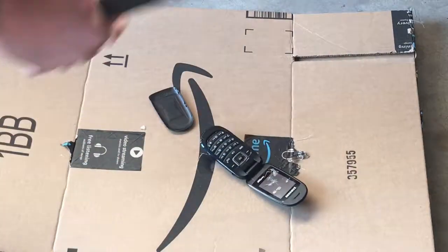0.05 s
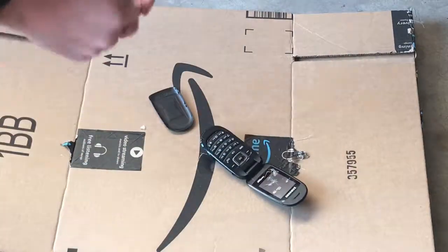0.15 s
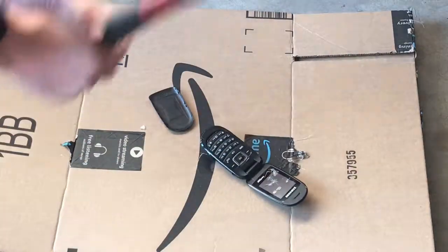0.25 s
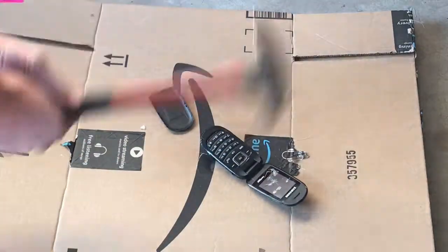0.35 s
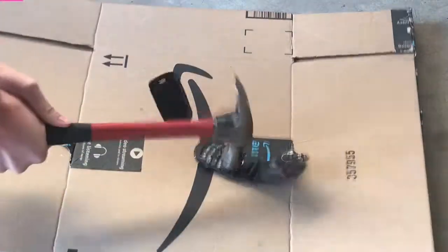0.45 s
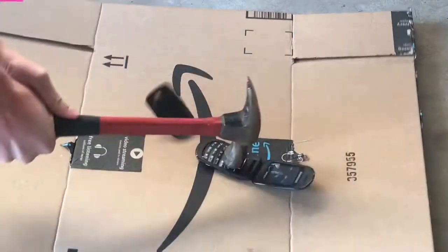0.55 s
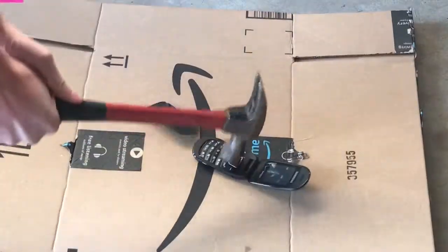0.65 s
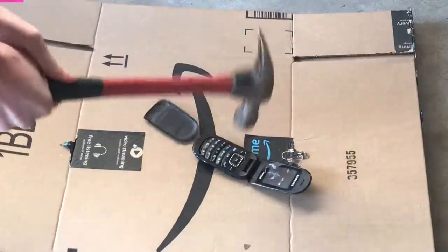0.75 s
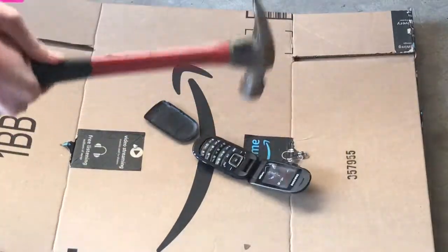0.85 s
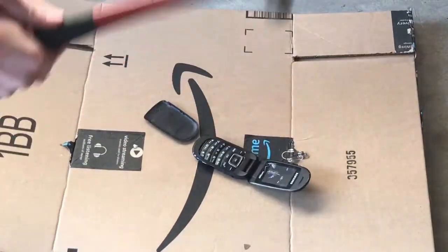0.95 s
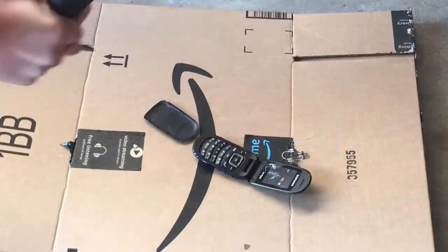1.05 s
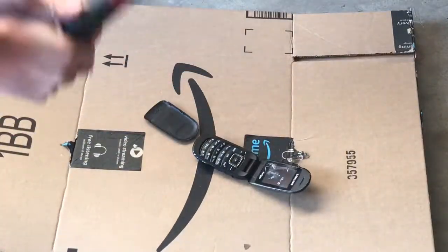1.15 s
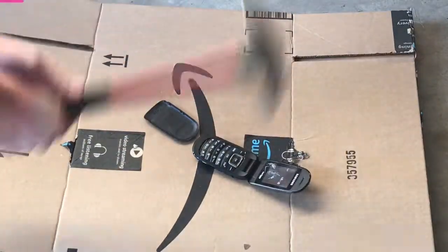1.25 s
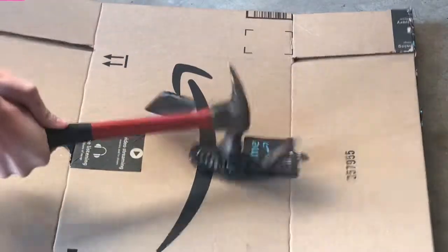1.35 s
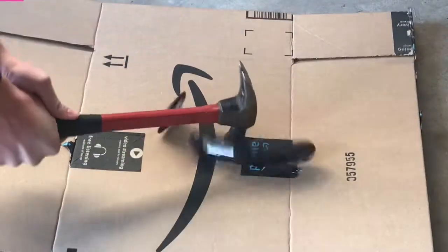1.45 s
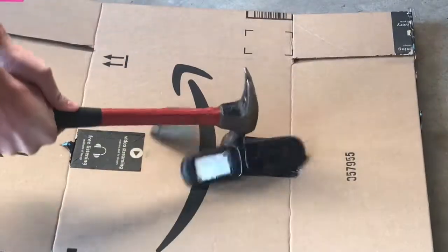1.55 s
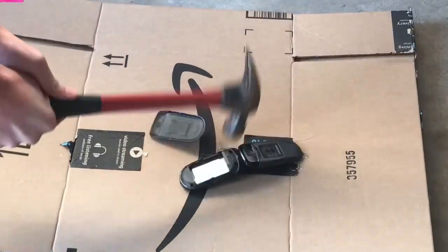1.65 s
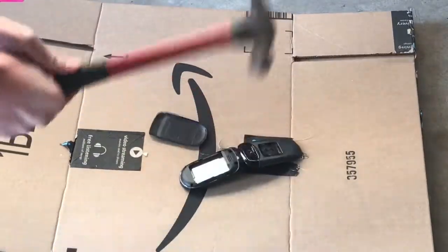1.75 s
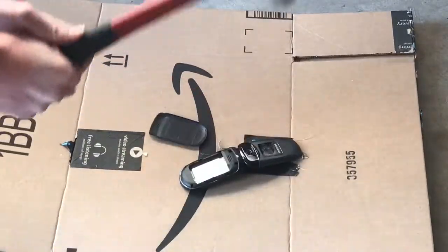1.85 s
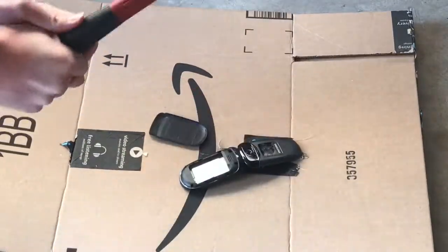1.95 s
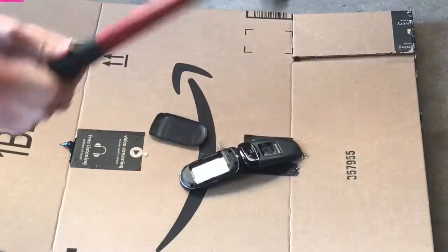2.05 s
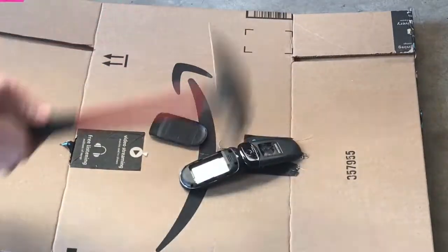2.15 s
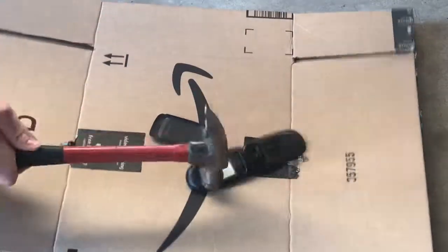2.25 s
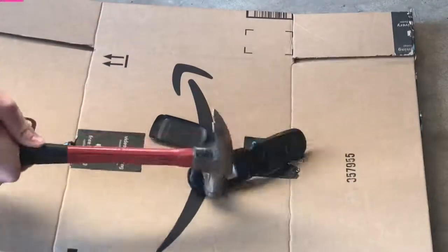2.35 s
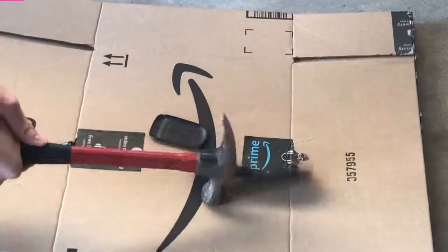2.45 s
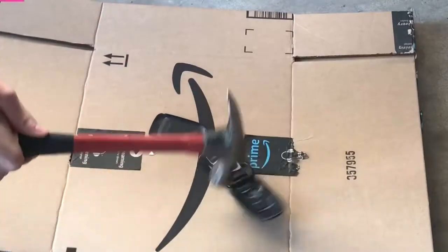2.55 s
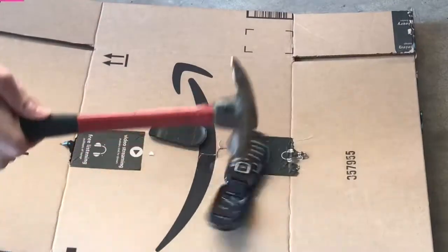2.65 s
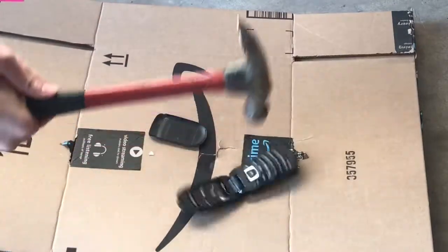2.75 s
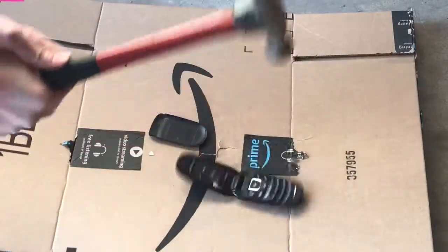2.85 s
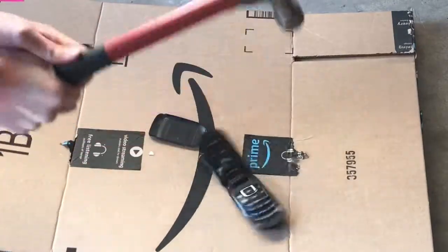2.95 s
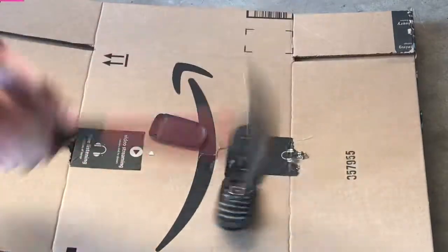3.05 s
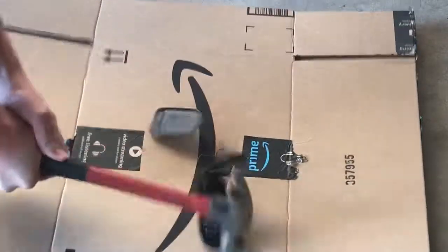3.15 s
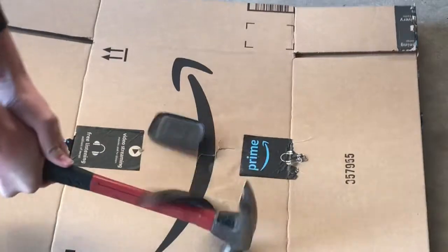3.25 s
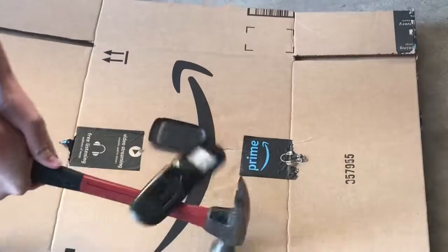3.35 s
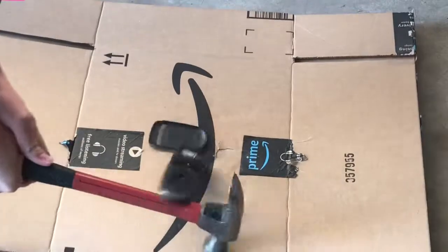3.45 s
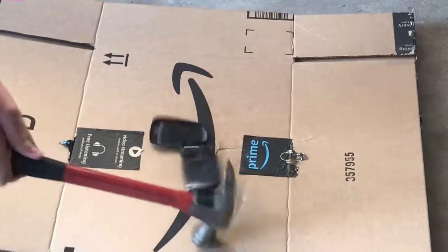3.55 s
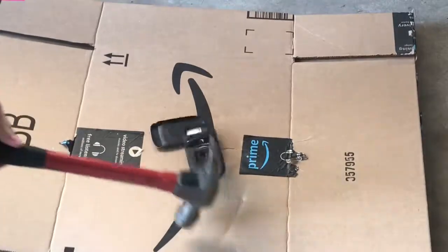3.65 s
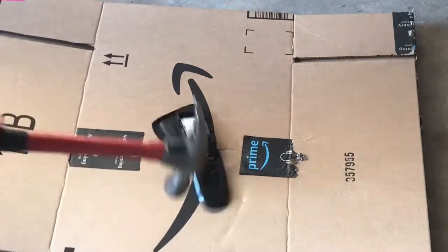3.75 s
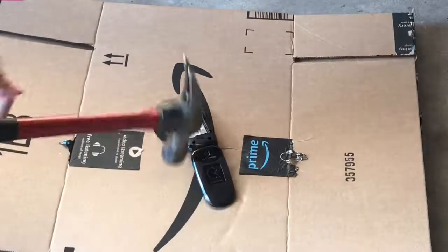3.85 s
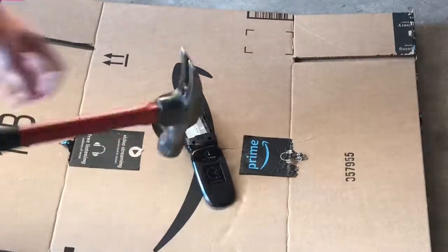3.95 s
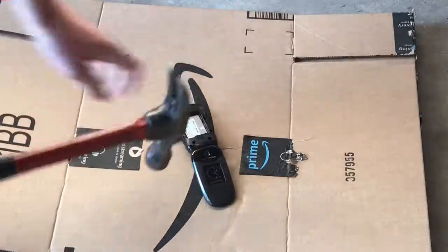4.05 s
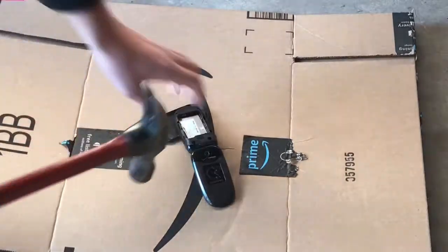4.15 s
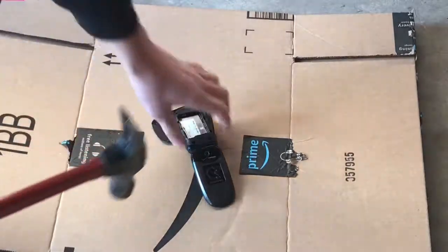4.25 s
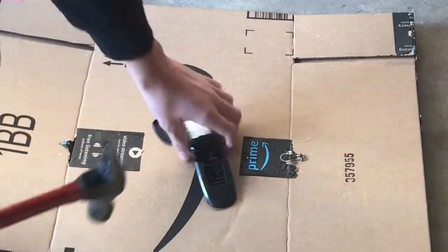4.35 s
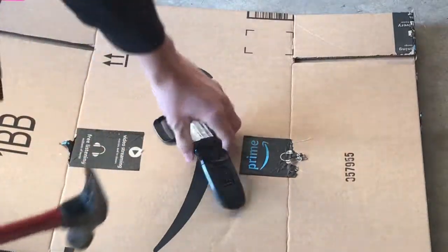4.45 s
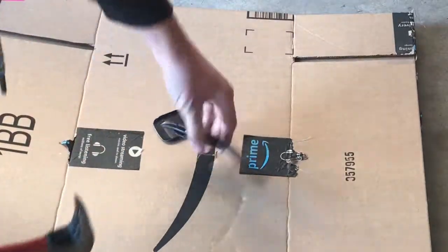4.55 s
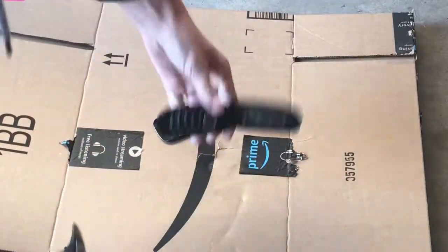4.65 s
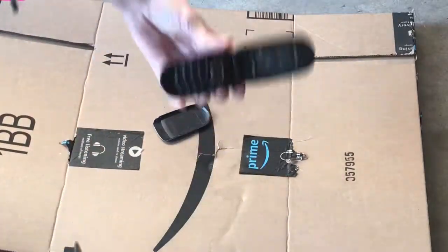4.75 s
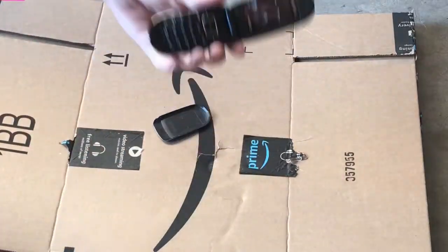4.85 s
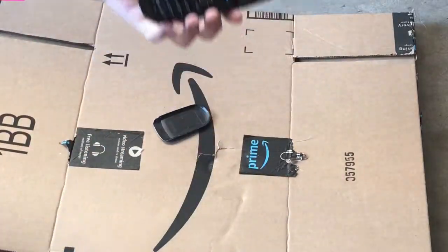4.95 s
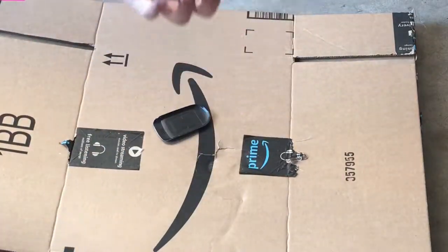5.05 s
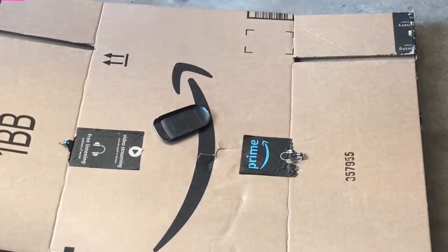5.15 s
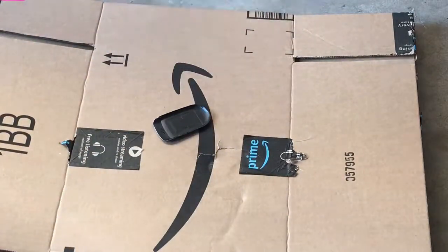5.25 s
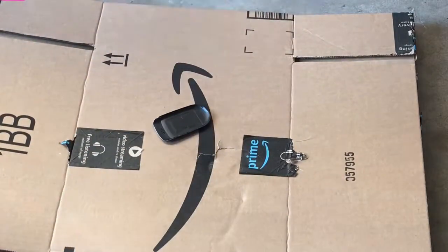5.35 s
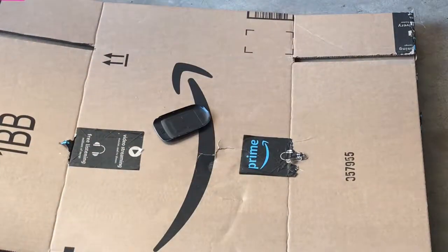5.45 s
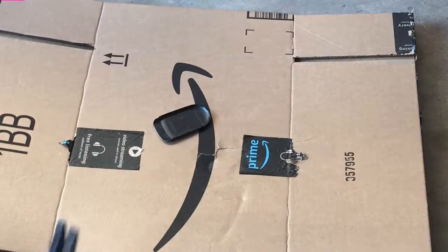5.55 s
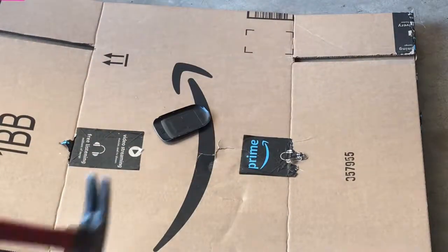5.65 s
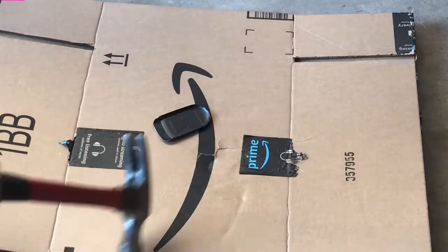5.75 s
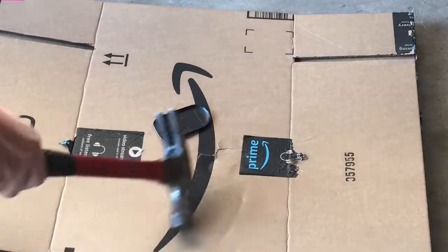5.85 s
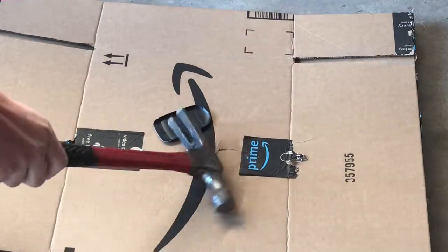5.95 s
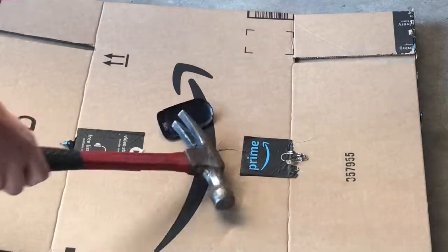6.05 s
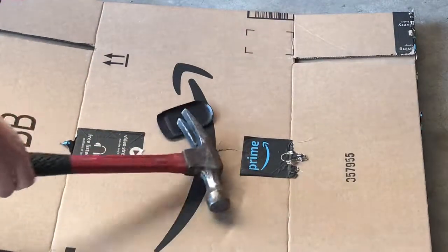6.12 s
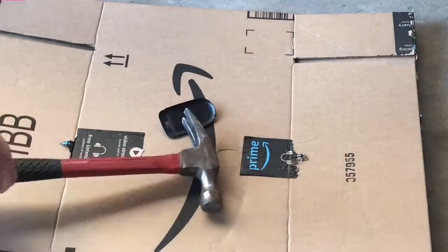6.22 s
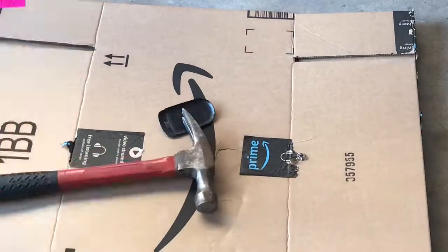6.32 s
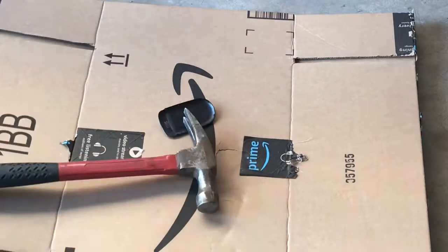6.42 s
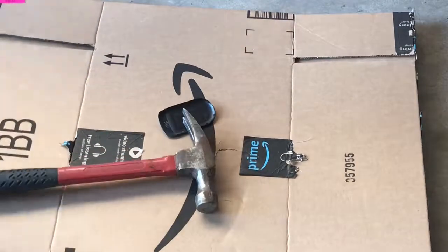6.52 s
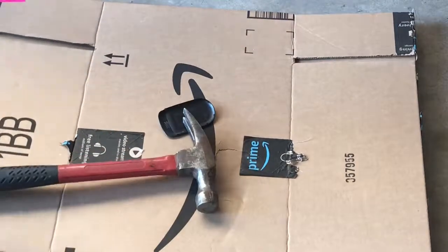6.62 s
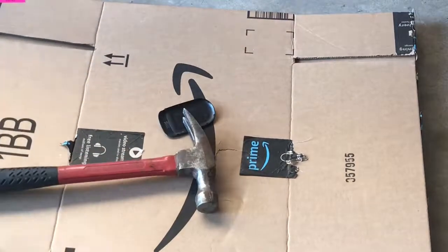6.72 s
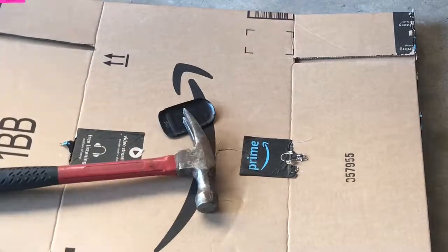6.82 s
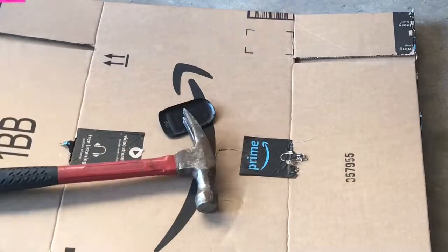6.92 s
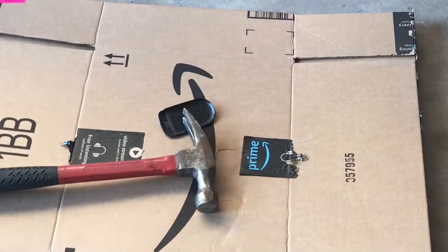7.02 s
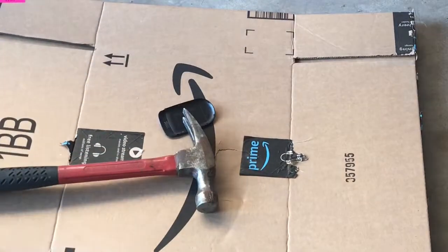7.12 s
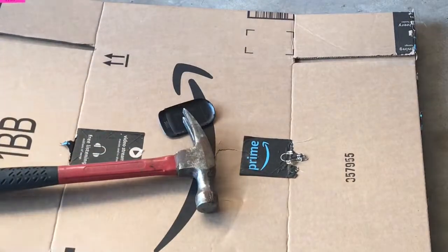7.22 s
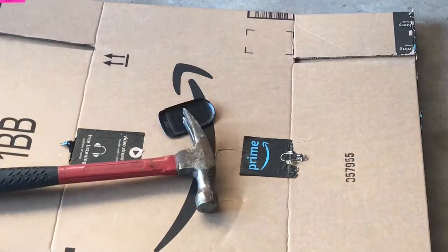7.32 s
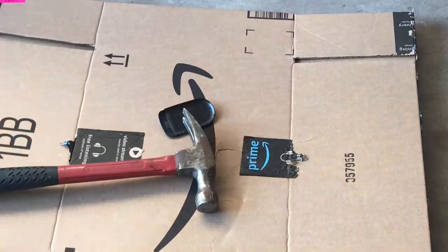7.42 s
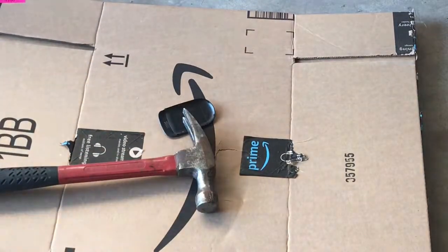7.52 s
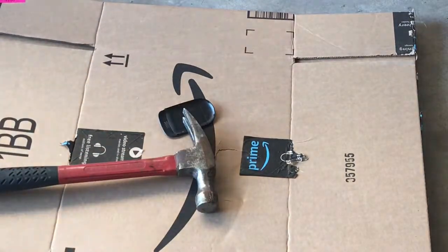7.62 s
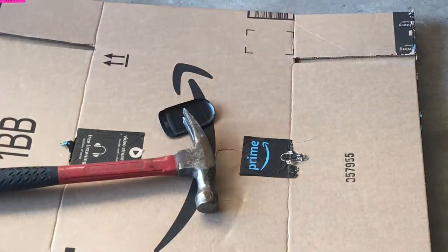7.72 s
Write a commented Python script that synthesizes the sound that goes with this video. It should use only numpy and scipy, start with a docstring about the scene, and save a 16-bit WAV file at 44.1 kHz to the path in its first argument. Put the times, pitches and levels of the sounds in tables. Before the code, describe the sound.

Four loud, cracking hammer hits on a small plastic phone, then loose clatter, light handling taps and the tool set down, distant traffic behind.

```python
"""A steel hammer strikes a folding plastic phone lying on cardboard over a concrete floor, four hard blows.
Each blow is gritty noise through cracking filters and shell and board resonances, with a floor thump.
Phone and battery cover bounce and clatter as smaller impacts; hands and tool scrape in filtered hiss.
The hammer head taps and rings in decaying sines. A bare room answers with noise echoes, and the open road
beyond brings tyre roar in shaped noise and engine drones in wavering sines."""
import sys
import numpy as np
from scipy import signal
from scipy.fft import rfft, irfft, next_fast_len
from scipy.io import wavfile
from scipy.ndimage import uniform_filter1d

SR = 44100
rng = np.random.default_rng(int(sys.argv[2]) if len(sys.argv) > 2 else 0)


def to_wav(s):
    """Save 16-bit WAV."""
    ch = np.atleast_2d(s).T  # columns
    pcm = np.round(np.clip(ch, -1, 1) * 32767)  # PCM
    wavfile.write(sys.argv[1], SR, pcm.astype(np.int16))


def how_loud(loudness_db):
    """Turn decibels into a plain amplitude multiplier (0 dB gives 1, 20 dB gives 10)."""
    steps = np.asarray(loudness_db, float) / 20
    return 10 ** steps


N = 342963
T = np.arange(N) / SR


def colour(x, points):
    """Filter by (Hz, dB) points, joined by straight lines over log frequency."""
    size = next_fast_len(len(x))
    hz = np.maximum(np.arange(size // 2 + 1) * SR / size, 1)
    point_hz, point_db = np.transpose(points)
    gain = how_loud(np.interp(np.log(hz), np.log(point_hz), point_db, left=-90))
    return irfft(rfft(x, size) * gain, size)[:len(x)]


def unit(x):
    """Scale to rms 1."""
    return x / np.sqrt(np.mean(x ** 2))


def resonate(x, peaks):
    """Parallel resonances, scaled so that white noise keeps its level."""
    click = np.zeros(SR // 4)
    click[0] = 1
    body = np.zeros(len(click))
    for k, (hz, width, db) in enumerate(peaks):
        mode = signal.lfilter(*signal.iirpeak(hz, hz / width, SR), click)
        body += (-1) ** k * how_loud(db) * mode
    return signal.fftconvolve(x, body / np.sqrt(np.sum(body ** 2)))[:len(x)]


def ring(modes):
    """Decaying sines; neighbours start in opposite directions, so a close pair blooms."""
    t = T[:SR]
    return sum((-1) ** k * how_loud(db - 60 * t / t60) * np.sin(2 * np.pi * hz * t)
               for k, (hz, db, t60) in enumerate(modes))


def walk(rate):
    """Random levels held 1 / rate s and slewed twice; spread near 1."""
    k = int(SR / rate)
    held = np.repeat(rng.standard_normal(N // k + 1), k)
    return 1.1 * uniform_filter1d(uniform_filter1d(held, k), k)[:N]


def contact(s, db, ms, rise_ms):
    """Envelope of contacts that rise fast and die away with their own length."""
    out = np.zeros(N)
    for start, level_db, length in zip(s, db, ms):
        i = int(start * SR)
        t = T[:min(N - i, SR // 5)] * 1000
        out[i:i + len(t)] += how_loud(level_db) * (1 - np.exp(-t / rise_ms)) * np.exp(-t / max(length, .3))
    return out


def grit(spread_db):
    """Noise whose level jumps every 24 samples: many tiny cracks."""
    sizes = np.repeat(rng.exponential(size=N // 24 + 1), 24)[:N]
    return unit(rng.standard_normal(N) * how_loud(spread_db * sizes))


# Low resonances of floor and room. Each row: pitch in Hz, level in dB, time to fall 60 dB in s.
THUMP = [(87, -10, .45), (119, -3, .45), (156, 0, .5), (205, -8, .12), (260, -8, .1)]
# Hammer blows. Each row: start in seconds, plastic drive in dB re crack, deepest cardboard modes in dB re crack,
# push into the floor in dB re crack, favoured pitch in Hz.
BLOWS = [(0.4661, -7.5, -4, -39.5, 800), (1.3675, -9, -3.5, -36.5, 886), (2.2587, -6.5, -3, -38, 630),
         (3.1473, -4, -8.5, -38, 870)]
BLOW_DB, BLOW_BOARD_DB = -5.5, -2.5  # crack; upper cardboard modes re crack
CRUNCH_MS = 8.9  # decay time of the crunch


def blows():
    """Crunch of the phone plus the thump passed into the floor."""
    s, plastic_db, deep_db, thump_db, favoured_hz = np.transpose(BLOWS)
    crack_db = np.full(len(s), BLOW_DB)
    ms = np.full(len(s), CRUNCH_MS)
    crunch = impacts(s, crack_db, plastic_db, BLOW_BOARD_DB, deep_db, ms, board_rise_ms=2.2, tick_db=0)
    # the board is pressed flat a moment after the first crack
    body = knocks(s + 0.0035, crack_db - 2.0, favoured_hz, 0.12)
    push = contact(s, crack_db + thump_db, 0.054 * ms, 0.38) * (1 + .5 * rng.standard_normal(N))
    thump = signal.fftconvolve(push, ring(THUMP))[:N]
    return crunch + body, thump


# Colour of the cracking plastic. Each row: frequency in Hz, gain in dB.
CRACK = [(4500, -5.5), (6000, -3.5), (8000, -7), (10000, -6.5), (12000, -25.5)]
# Colour of the finest, highest cracks. Each row: frequency in Hz, gain in dB.
SNAP = [(7000, -18), (9500, -1), (13000, -2), (16000, -5.5)]
# Resonances of the phone shell. Each row: pitch in Hz, width in Hz, level in dB.
PLASTIC = [(1800, 920, 3), (1930, 240, 8.5), (2090, 210, 4), (2470, 500, 3.5), (2895, 210, 3),
           (3330, 360, -1.5), (4190, 600, -6)]
# Resonances of the cardboard, deepest first. Each row: pitch in Hz, width in Hz, level in dB.
BOARD = [(338.2, 54, -0.5), (454, 62, -4.5), (570, 160, -6.5), (711, 210, -2), (776, 150, -2.5),
         (835, 71, -1), (1013.5, 260, -5.5), (1080, 38, -3), (1230, 450, -10)]
DEEP_MODES = 3  # rows of BOARD that count as deepest
CRUMBLE_DB, SNAP_SPREAD_DB = 1.2, 2.5  # spread of crack sizes: in shell and board; in the finest cracks


def impacts(s, crack_db, plastic_db, board_db, deep_db, ms, board_rise_ms, tick_db):
    """A sharp first tick, then cracking drives the shell; the cardboard swells more slowly."""
    def tick(db):
        out = np.zeros(N)
        out[(s * SR).astype(int)] = how_loud(db + tick_db)
        return out

    def drive(db, lengths, rise_ms, spread_db, tick_lift_db=0):
        return contact(s, db, lengths, rise_ms) * grit(spread_db) + tick(db + tick_lift_db)

    crack = colour(drive(crack_db, ms, 0.046, 0.56), [(3000, -45)] + CRACK)
    # flat, body-heavy landings have less of the finest snap
    top_db = crack_db - 5.5 - 0.18 * np.maximum(plastic_db, 0)
    snap = colour(drive(top_db, ms, .05, SNAP_SPREAD_DB), SNAP)
    plastic = resonate(drive(crack_db + plastic_db, ms, 0.11, CRUMBLE_DB), PLASTIC)
    board = np.zeros(N)
    for db, modes in ((deep_db, BOARD[:DEEP_MODES]), (board_db, BOARD[DEEP_MODES:])):
        board += resonate(drive(crack_db + db, 0.93 * ms, board_rise_ms, CRUMBLE_DB, 7.0), modes)
    return crack + snap + plastic + board


RESTING_WIDTH_HZ, RESTING_DB = 140, 18  # the steel modes while the head lies on the cardboard


def knocks(s, level_db, favoured_hz, spread):
    """Each contact also rings the few modes that lie near the pitch its contact point favours."""
    out = np.zeros(N)
    resting = [(hz, RESTING_WIDTH_HZ, RESTING_DB) for hz, _, _ in STEEL]
    hz, width, db = np.transpose(BOARD + PLASTIC + resting)[:, :, None]
    t = T[:SR // 8]
    decay = np.exp(-np.pi * .5 * np.minimum(width, 200) * t)
    modes = how_loud(db) * decay * np.sin(2 * np.pi * hz * t)
    for start, peak_db, centre in zip(s, level_db, favoured_hz):
        share = np.exp(-(np.log(hz / centre) / spread) ** 2)
        i = int(start * SR)
        out[i:i + len(t)] += how_loud(peak_db) * np.sum(share * modes, axis=0)
    return out


# Pieces landing and tapping. Each row: start in seconds, crack in dB, body in dB re crack before the tilt by
# pitch, decay time of the contact in ms, favoured pitch in Hz.
CLATTER = [(0.1735, -42, -16, 5.5, 900), (0.6759, -18, -6.5, 4, 1890), (0.778, -41.5, 11.5, 1.9, 2000),
           (0.847, -46, 12, 1.4, 1080), (0.89, -51, 5, 3.7, 926), (1.0291, -48, -12, 2.8, 761),
           (1.48, -21, -22.5, 4.6, 1200), (1.5263, -37, 3, 4.8, 639), (1.5549, -27, -10, 5.3, 800),
           (1.5906, -42.5, 8, 3.7, 649), (1.6482, -36, -18, 5.8, 1900), (1.6652, -31, 4.5, 8.7, 910),
           (1.731, -41.5, 5.5, 4, 705), (1.7634, -46.5, -10, 3.3, 1200), (1.7824, -31, 7.5, 4.5, 1014),
           (1.8675, -45, -2, 3, 791), (2.3057, -25, -15.5, 4.3, 1230), (2.3238, -15.5, -3, 3.4, 890),
           (2.4683, -14.5, -10.5, 4.2, 2450), (2.4782, -32.5, -0.5, 5.9, 1020), (2.584, -39, 0.5, 14, 1040),
           (2.6429, -43.5, 5.5, 3.9, 1900), (3.244, -24.5, -12, 4.4, 1033), (3.256, -20, -15, 4.3, 1010),
           (3.2869, -26.5, -7, 4.2, 1000), (3.3162, -27, -19, 9.7, 1700), (3.3322, -40, 5, 5.5, 2900),
           (3.3464, -32, 1.5, 3.9, 1230), (3.3793, -24, -6.5, 3.2, 1900), (3.4173, -29.5, -0.5, 2.2, 2890),
           (3.4363, -36.5, 11, 4.7, 650), (3.495, -34.5, 2, 3.5, 2116), (3.5463, -42, 20, 1.9, 1050),
           (3.5606, -30.5, -4, 1.1, 2100), (3.578, -48, 12, 3, 1030), (3.604, -51, -3, 3.5, 1200),
           (3.6196, -43.5, 7, 3.6, 746), (3.6386, -40, 1.5, 7.8, 2100), (3.694, -41.5, 5.5, 7.5, 2900),
           (3.7326, -52.5, 17.5, 18, 1030), (3.756, -46, 0, 4.5, 1200), (3.8066, -25.5, 4.5, 11, 2090),
           (3.8206, -22.5, -26, 3.1, 1530), (4.1554, -53, 4, 5.9, 700), (4.364, -48.5, 4.5, 5.2, 746),
           (4.4307, -52, 10.5, 9.4, 700), (5.1085, -56, 20, 2.5, 1000), (5.9014, -51, -5, 4, 1080),
           (5.912, -40.5, -2.5, 11.2, 802), (6.0572, -31, -2, 17.4, 1444), (6.076, -29, 0.5, 11, 1730),
           (6.2193, -26, -1, 8.1, 3200), (6.348, -33, 3, 2.4, 1170), (6.3969, -28, -9.5, 1.9, 1670),
           (6.4722, -41.5, -6, 5.3, 600), (6.4921, -32, -15, 2.9, 700), (6.5999, -43.5, -3, 4.1, 2100),
           (6.7406, -40.5, -6, 4.3, 910), (6.824, -38, -14, 3.2, 600), (6.9913, -29, -17.5, 6.8, 4900),
           (7.503, -31, -7.5, 5, 2400), (7.326, -51, -3, 3, 1200), (7.6415, -49, -6, 6.4, 860)]
# a contact that favours higher pitches drives the shell more and the cardboard less
SHELL_DB, SHELL_DB_PER_OCTAVE, BOARD_DB_PER_OCTAVE = -4, 3.5, -1.5
DEEP_DB = -4  # deepest cardboard modes re the upper ones


def clatter():
    """Small landings: cracks and a short coloured knock."""
    s, crack_db, body_db, ms, favoured_hz = np.transpose(CLATTER)
    octaves = np.log2(favoured_hz / 1000)
    plastic_db = body_db + SHELL_DB + SHELL_DB_PER_OCTAVE * octaves
    board_db = body_db + BOARD_DB_PER_OCTAVE * octaves
    landings = impacts(s, crack_db, plastic_db, board_db, board_db + DEEP_DB, ms,
                       board_rise_ms=0.22, tick_db=7.1)
    return landings + knocks(s, crack_db + body_db - 6.0, favoured_hz, 0.064)


# Brief brushes of sleeve or finger. Each row: peak in seconds, hiss in dB, swell time in seconds,
# lower scrape in dB re hiss.
BRUSHES = [(0.256, -48, 0.037, -7.5), (4.161, -63, 0.015, -12), (4.435, -55, 0.021, 10.5),
           (4.5, -60.5, 0.044, 5), (7.163, -60.5, 0.019, 4), (7.642, -72, .03, 0)]
BRUSH_EDGE_DB = 16  # fall at one swell time either side of the peak
# Pieces, hand and tool sliding to rest. Each row: start in seconds, length in seconds, hiss at the start in dB,
# lower scrape in dB re hiss.
SLIDES = [(0.163, 0.37, -71, -5), (0.7, 0.31, -66.5, 9), (1.502, 0.39, -63.5, 9), (2.498, 0.4, -68, 7),
          (3.294, 0.85, -58, 3), (4.1, 0.49, -71, 2), (5.906, 0.16, -55.5, 3), (6.12, 0.53, -68, 7),
          (6.59, 0.36, -68, 6), (7.098, 0.16, -77, 7), (7.602, 0.17, -71.5, 1)]
SLIDE_DB_PER_S = -16.5
RASP_DB = 2.3  # spread of scrape grains


def rubbing():
    """Gritty hiss with a duller scrape under it and a fine rustle above."""
    hiss, scrape = np.zeros((2, N))
    for s, db, swell, scrape_db in BRUSHES:
        level = how_loud(db - BRUSH_EDGE_DB * np.abs(T - s) / swell)
        hiss += level
        scrape += level * how_loud(scrape_db)
    for s, length, db, scrape_db in SLIDES:
        stop = np.clip((s + length - T) / .03, 0, 1)
        level = how_loud(db + SLIDE_DB_PER_S * (T - s)) * (T > s) * stop
        hiss += level
        scrape += level * how_loud(scrape_db)
    grain = unit(colour(grit(1.5), [(3000, -34.5), (4500, -6.0), (8000, -9.0), (10500, -18.0)]))
    rasp = unit(resonate(grit(RASP_DB), PLASTIC))
    rustle = unit(colour(grit(1.7), [(7000, -38.0), (9500, -1.0), (16000, -4.5)]))
    rubbed = hiss * how_loud(3.0 * walk(12)) * grain + scrape * rasp + hiss * rustle
    return how_loud(1.6 * walk(60)) * rubbed


# Modes of the steel head. Each row: pitch in Hz, level in dB, time to fall 60 dB in s when it rings freely.
STEEL = [(4430, 3, .17), (4530, 4, .12), (5163, 1, .37), (5486, 3, .7), (5488, 0, .25)]
# Resonances of the dry tap. Each row: pitch in Hz, width in Hz, level in dB.
TAP = [(325, 140, 8), (815, 170, 8.5), (1280, 460, 6.5), (2150, 470, 5.5), (4550, 500, -3),
       (6660, 2900, -15.5), (11000, 5000, -28)]
# Knocks of the head. Each row: start in seconds, ring in dB, dry tap in dB.
STEEL_KNOCKS = [(5.069, -55.5, -18), (6.081, -56, -53.5)]
TAP_ROOM_DB = -9.5  # room send of the tap


def steel():
    """The hammer head taps something hard, short and dry, and rings in a few high modes."""
    s, ring_db, tap_db = np.transpose(STEEL_KNOCKS)
    strikes = np.zeros(N)
    strikes[(s * SR).astype(int)] = how_loud(ring_db)
    ringing = signal.fftconvolve(strikes, ring(STEEL))[:N]
    tap = contact(s, tap_db, np.full(len(s), 1.5), 0.043) * rng.standard_normal(N)
    tap = resonate(tap, TAP)
    return ringing + tap + how_loud(TAP_ROOM_DB) * room(tap)


# Decay of the room. Each row: frequency in Hz, time to fall 60 dB in s.
ROOM_T60 = [(100, 0.56), (300, 0.52), (700, 0.4), (1500, 0.37), (3900, 0.36), (8000, 0.31), (14000, .25)]
# Colour of the room. Each row: frequency in Hz, gain in dB.
ROOM_DB = [(60, -10.5), (200, 4.5), (400, 4), (700, 6.5), (1500, 6.5), (2500, 5), (3900, 6), (8000, 4.5),
           (14000, 1.5)]
LATE_DB, LATE_STRETCH = -21.5, 2.2  # faint second tail from the open space beyond: re the room; times its decay
ECHO_LAG = SR // 200  # samples


def room(x):
    """Diffuse echoes: the energy at each frequency lingers as noise and dies at its own rate."""
    hz, t, near = signal.stft(x, SR, nperseg=256, noverlap=192)
    chance = signal.stft(rng.standard_normal(N), SR, nperseg=256, noverlap=192)[2]
    decay_hz, decay_s = np.transpose(ROOM_T60)
    t60 = np.interp(np.log(hz + 1), np.log(decay_hz), decay_s)
    keep = how_loud(-120 * t[1] / t60)  # share of energy left after one frame

    def linger(share):
        return np.array([signal.lfilter([1], [1, -k], np.abs(row) ** 2) for k, row in zip(share, near)])

    energy = linger(keep) + how_loud(2 * LATE_DB) * linger(keep ** (1 / LATE_STRETCH))
    tail = signal.istft(np.sqrt(energy) * chance, SR, noverlap=192)[1]
    # the echoes begin a few ms after the sound
    return colour(np.concatenate([np.zeros(ECHO_LAG), tail])[:N], ROOM_DB)


# Spectrum of the road. Each row: frequency in Hz, relative level in dB per Hz.
ROAD = [(21, -44.5), (35, -0.5), (81, 2.5), (124, -4), (202, -3), (294, -11.5), (401, -9.5), (490, -15.5),
        (585, -9.5), (952, -6.5), (1550, -15), (2470, -28), (4110, -37.5), (4910, -45), (7000, -50.5),
        (9100, -82), (15400, -120)]
# Passing traffic. Each row: time in seconds, tyre roar in dB before its swells.
TRAFFIC = [(0.0, -48.5), (2.0, -47), (4.2, -48), (6.4, -46.5), (7.78, -45.5)]
# Engine drones that swell and fade. Each row: start in seconds, end in seconds, first pitch in Hz,
# last pitch in Hz, level in dB.
DRONES = [(1.45, 2.05, 90.3, 89.8, -47), (3.654, 4.55, 87, 87.5, -44.5), (5.099, 6.2, 86.4, 85.6, -47.5),
          (6.2, 7.2, 75.5, 73.1, -47.5), (7.299, 8.2, 74.7, 74, -44), (-.4, .35, 204.5, 203.7, -53.5),
          (0.342, 1.6, 198, 201.9, -53.5), (3.488, 4.1, 197, 199.4, -49.5), (5.35, 6.3, 214, 211, -49.5),
          (6.152, 7.7, 187.2, 181.4, -48.5), (5.0, 5.95, 568, 550, -54)]
RUMBLE_DB = 2.5  # lift of the road below 280 Hz


def road():
    """Tyre roar and rumble in shaped noise; bass and middle swell separately, under the drones."""
    low_pass = signal.butter(2, 280, fs=SR, output="sos")
    high_pass = signal.butter(2, 280, "high", fs=SR, output="sos")
    low = signal.sosfilt(low_pass, colour(rng.standard_normal(N), ROAD))
    high = signal.sosfilt(high_pass, colour(rng.standard_normal(N), ROAD))
    traffic_db = np.interp(T, *np.transpose(TRAFFIC))
    scale = how_loud(traffic_db) / np.sqrt(np.mean(high ** 2))
    roar = high * how_loud(.6 * walk(7))
    rumble = low * how_loud(RUMBLE_DB + 1.2 * walk(5))
    return scale * (roar + rumble) + sum(drone(*line, rough=0.98) for line in DRONES)


def drone(start, end, first_hz, last_hz, db, rough):
    """An engine line that fades in and out and wavers in level and phase (rough, in radians)."""
    along = np.clip((T - start) / (end - start), 0, 1)
    pitch = first_hz + (last_hz - first_hz) * along
    phase = 2 * np.pi * np.cumsum(pitch) / SR + rough * walk(7.5)
    fade = np.sqrt(2 * np.sin(np.pi * along).clip(0))
    return fade * how_loud(db + 2.0 * walk(13)) * np.sin(phase)


def scene():
    """Close sounds and their room, over the road."""
    crunch, thump = blows()
    near = crunch + clatter() + rubbing()
    return (near + room(near) + thump + steel() + road())[None]


def top_cut(x):
    """Nothing passes above the cut-off."""
    return signal.sosfilt(signal.butter(12, 16840, fs=SR, output="sos"), x)


# Tone of the microphone. Each row: frequency in Hz, gain in dB.
MIC = [(20, -2.5), (9000, -1), (10600, -5.5), (12000, 0), (16000, -5.5)]
CEILING, TOP_HZ = .6, 15900  # full-scale limit of the rounded peaks; treble cutoff


def record(dry):
    """The microphone cuts both ends, hisses faintly and rounds the loudest peaks."""
    hiss = colour(rng.standard_normal(N), [(2000, -76.5), (8000, -74.5), (16000, -76.0)])
    bass_cut = signal.butter(3, 45, "high", fs=SR, output="sos")
    heard = colour(signal.sosfilt(bass_cut, dry[0] + hiss), MIC)
    rounded = CEILING * np.tanh(heard[None] / CEILING)
    treble_cut = signal.ellip(6, .3, 50, TOP_HZ, fs=SR, output="sos")
    return top_cut(signal.sosfilt(treble_cut, rounded))


dry = scene()
out = record(dry)
to_wav(out)
```